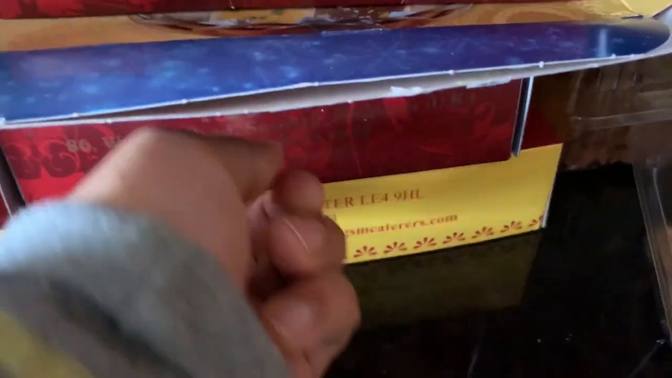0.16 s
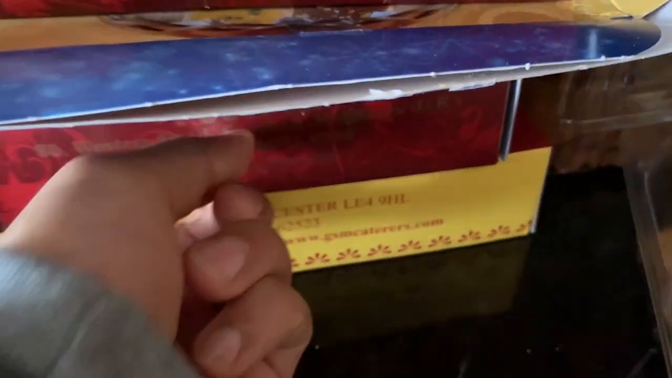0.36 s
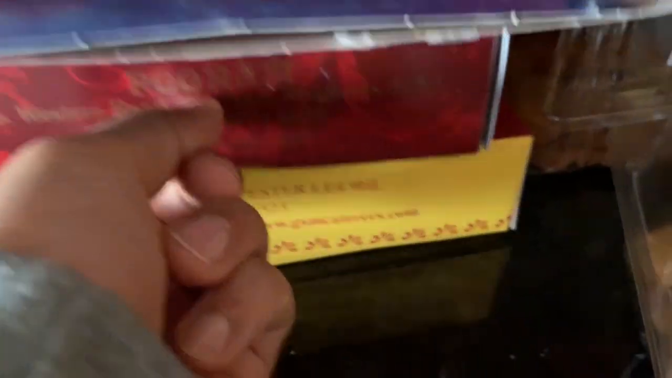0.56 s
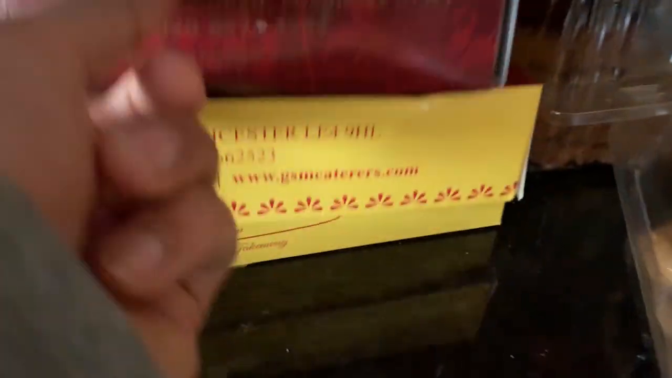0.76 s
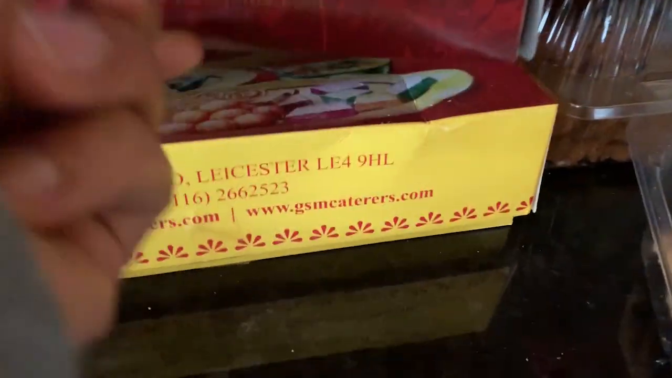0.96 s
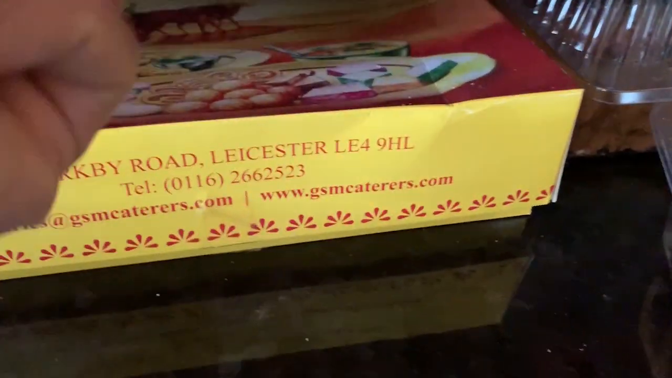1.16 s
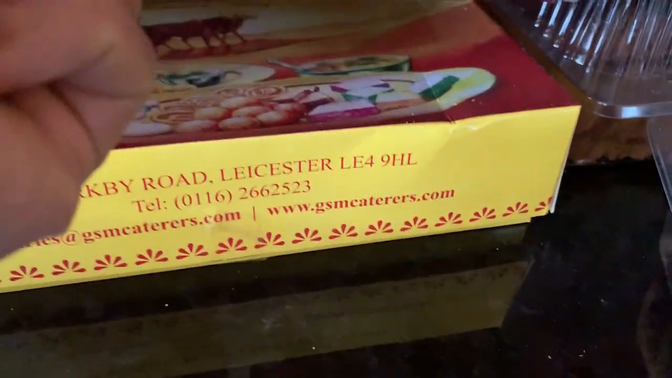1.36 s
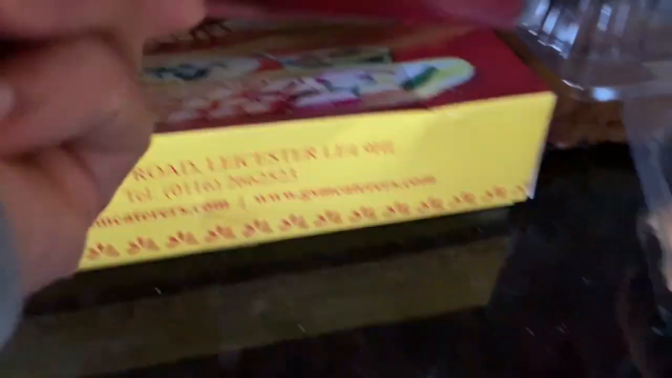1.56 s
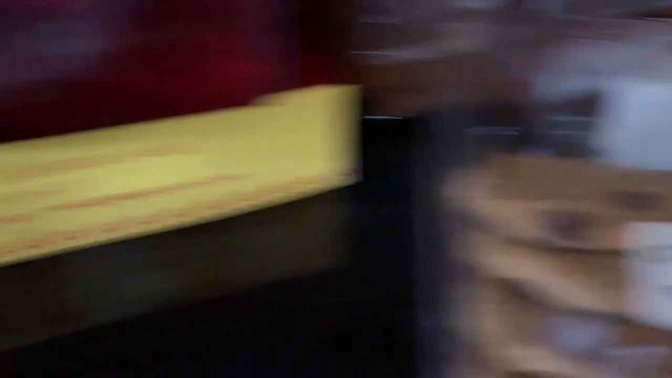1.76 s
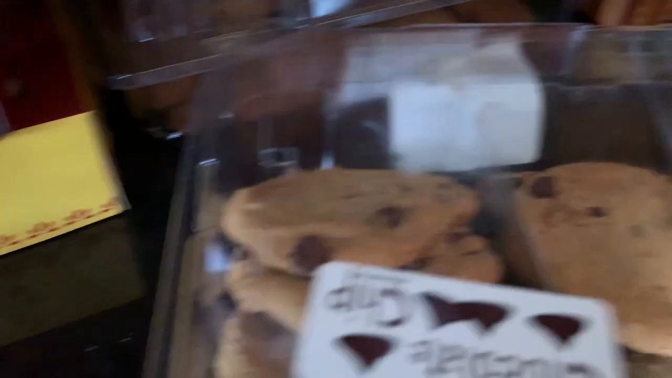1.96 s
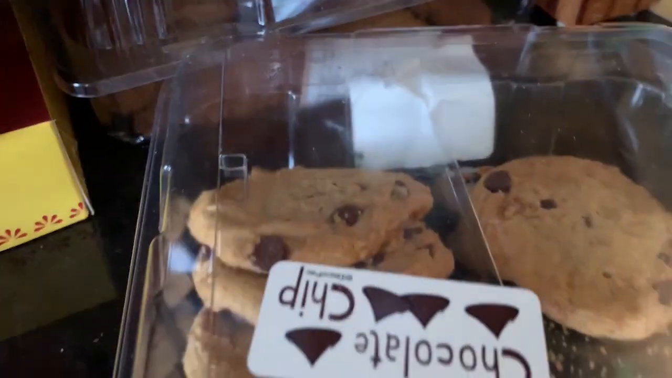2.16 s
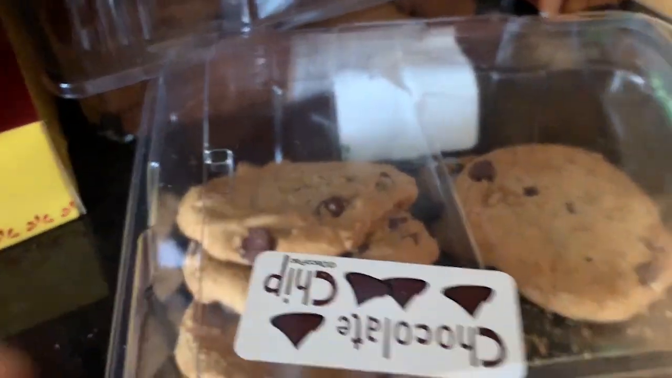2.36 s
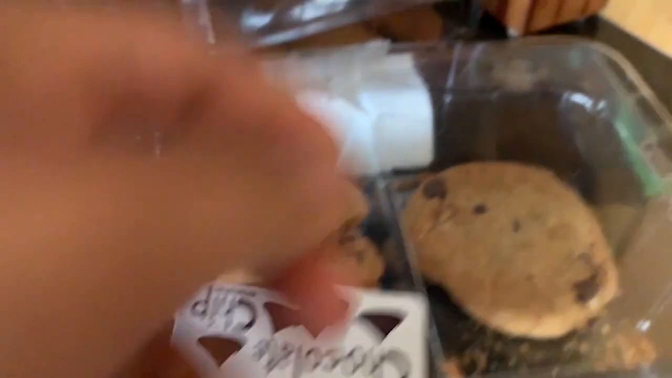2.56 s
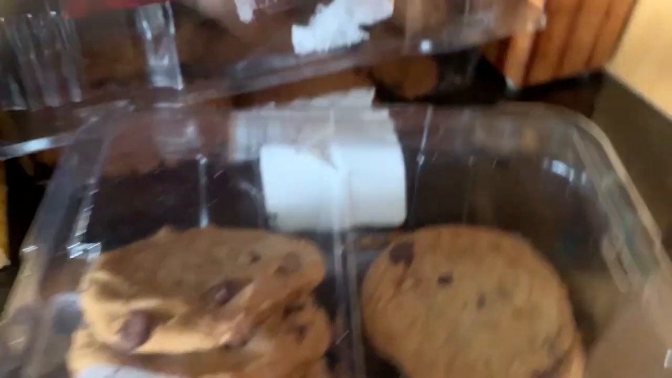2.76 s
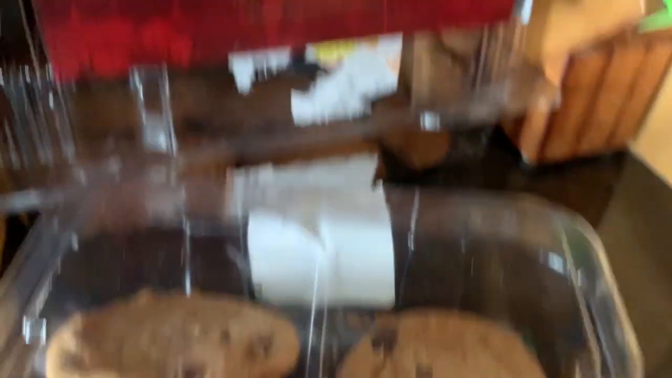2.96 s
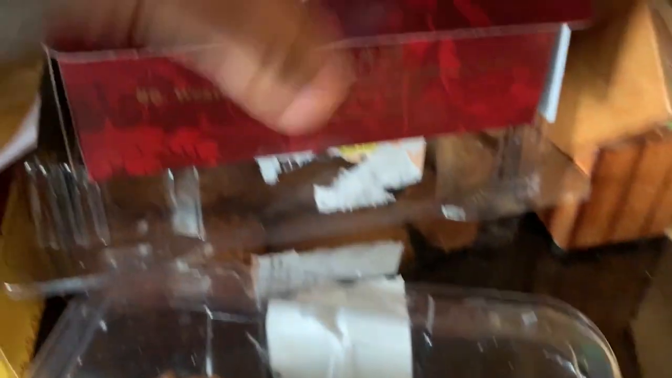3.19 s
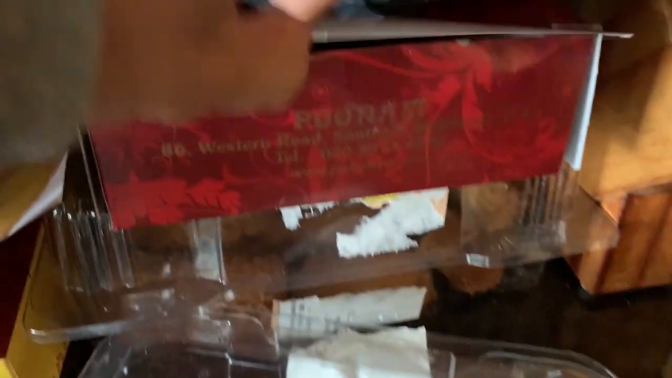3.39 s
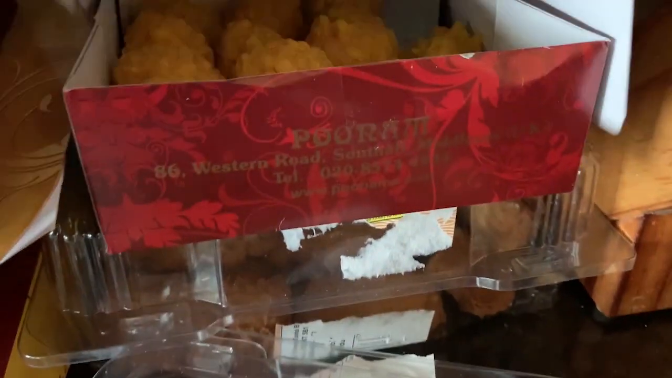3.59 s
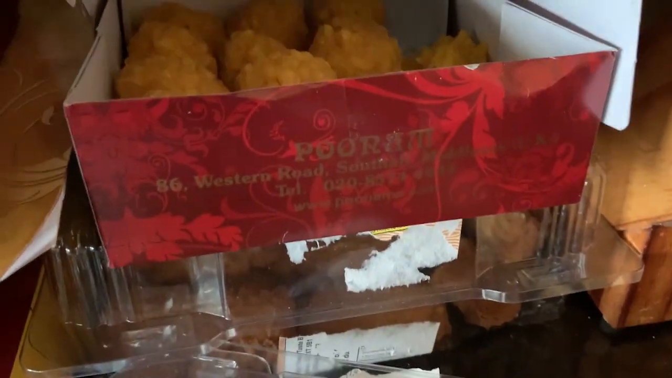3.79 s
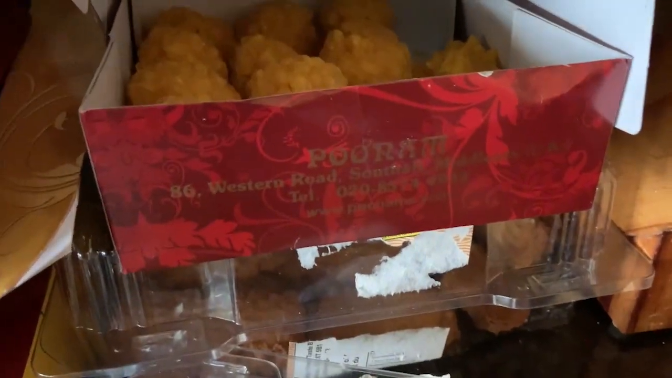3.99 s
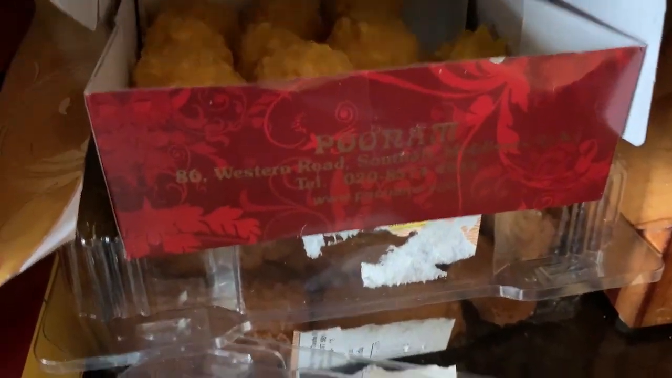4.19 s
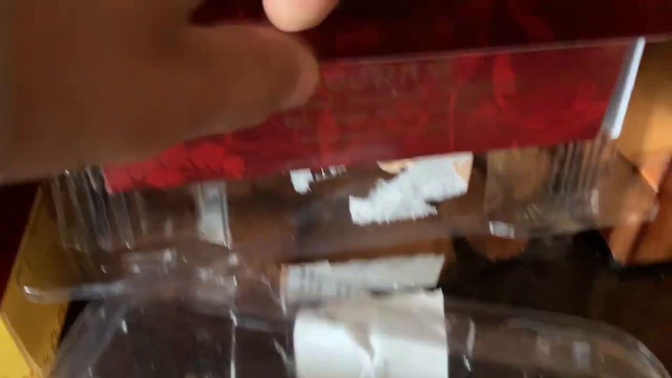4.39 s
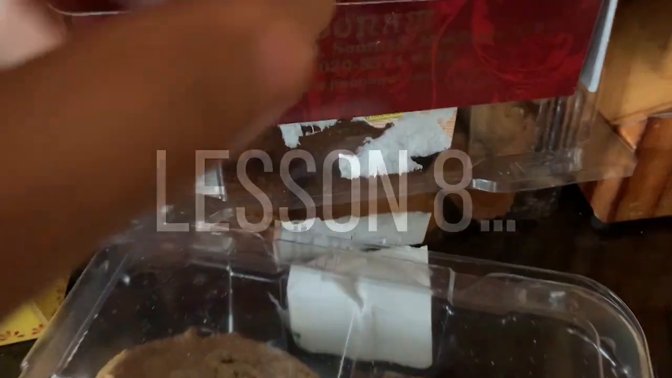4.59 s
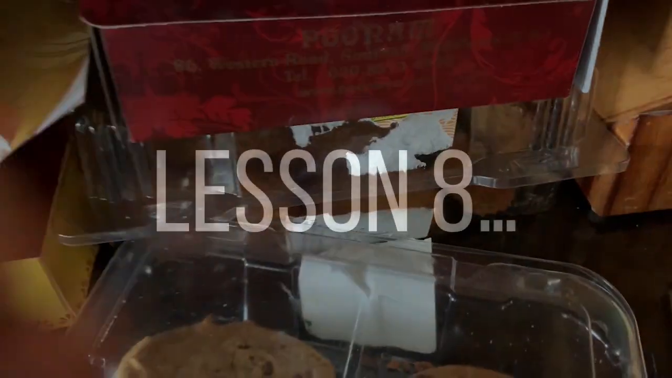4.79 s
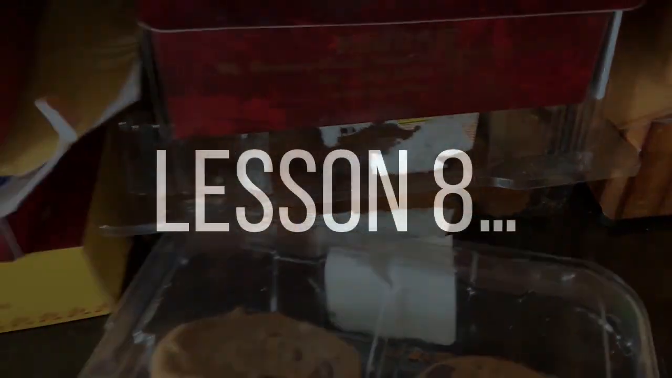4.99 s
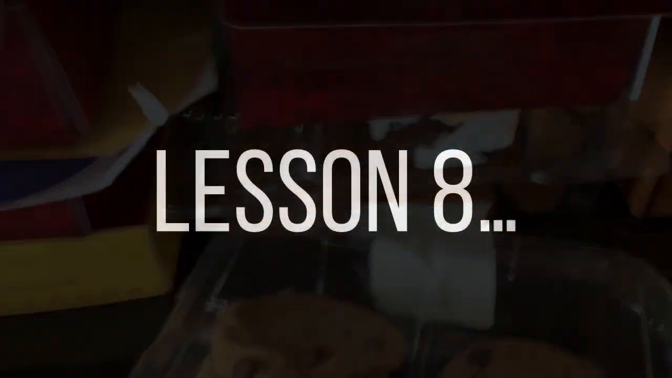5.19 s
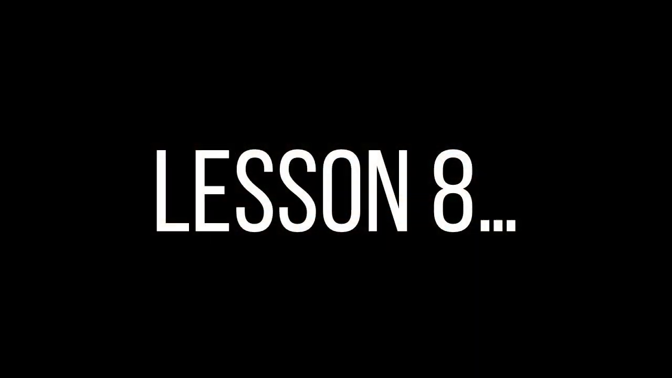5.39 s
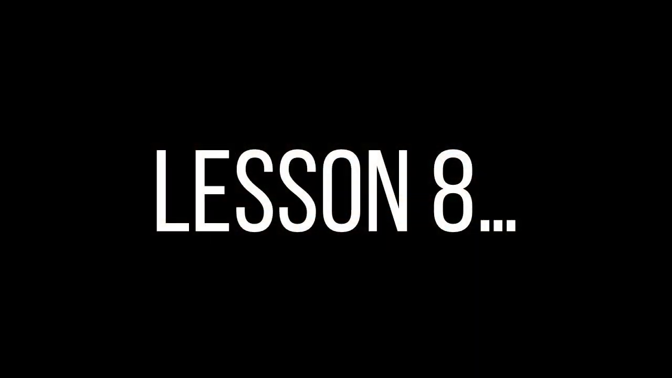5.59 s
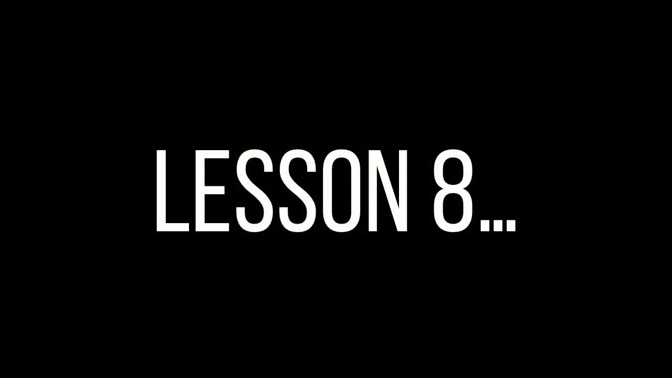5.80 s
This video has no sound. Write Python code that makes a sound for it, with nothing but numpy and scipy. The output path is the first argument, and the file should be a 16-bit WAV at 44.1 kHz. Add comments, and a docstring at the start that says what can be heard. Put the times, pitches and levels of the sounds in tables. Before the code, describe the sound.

Hands slide, open and shut cardboard food boxes and a crackly plastic tray close up, ending in a hard double knock over a low hum.

```python
"""Cardboard cake boxes on a stone worktop

Hands lift, slide and shut card boxes and a thin plastic tray close to a phone; at the end it fades to silence.
Sliding is grainy noise in clumps; knocks are short falling cycles in noise; thumps are slow swings of card
panels; snaps are bright bursts of a few ms. A short room answer follows the hits.
Behind lie the air noise of the room, a fridge hum that changes as the phone turns, and faint fan tones."""
import sys
import numpy as np
from scipy import signal
from scipy.fft import rfft, irfft, next_fast_len
from scipy.io import wavfile
from scipy.ndimage import uniform_filter1d, map_coordinates

SR = 44100
rng = np.random.default_rng(int(sys.argv[2]) if len(sys.argv) > 2 else 0)


def int16_out(signal):
    """Quantize to a 16-bit WAV file."""
    q = np.round(np.clip(np.atleast_2d(signal).T, -1, 1) * 32767)
    wavfile.write(sys.argv[1], SR, q.astype(np.int16))


N = 257984
T = np.arange(N) / SR
TOP_HZ = 17022  # highest frequency kept


def amp(db):
    """Gain of a level in dB."""
    return 10 ** (np.asarray(db) / 20)


def unit(x):
    """x at rms 1."""
    return x / np.sqrt(np.mean(x ** 2) + 1e-20)


def along(points, hz):
    """Curve through (Hz, value) points, straight on a log frequency axis."""
    f, v = np.transpose(points)
    return np.interp(np.log(hz + 1), np.log(f + 1), v)


def wobble(rate):
    """A smooth random curve with rate knots a second."""
    knots = rng.standard_normal(int(N * rate / SR) + 4)
    return map_coordinates(knots, [T * rate])


def filtered(x, response):
    """x shaped by a real or complex response of frequency."""
    m = next_fast_len(N + SR // 2)
    hz = np.fft.rfftfreq(m, 1 / SR)
    return irfft(rfft(x, m) * response(hz), m)[..., :N]


def spread(pair, spectrum, alike, lead):
    """Two unrelated signals, coloured, mixed to a left-right likeness and shifted between the ports."""
    def mix(hz):
        turn = np.arccos(np.clip(along(alike, hz), -1, 1)) / 2
        return amp(along(spectrum, hz)) * [np.cos(turn), np.sin(turn)]

    mid, side = filtered(pair, mix)
    stereo = np.array([mid + side, mid - side])
    return filtered(stereo, lambda hz: np.exp(.5j * np.outer([1, -1], along(lead, hz))))


def spread_near(pair, spectrum):
    """Places a sound made by hands near the phone between its two ports."""
    # likeness of the ports close up: (frequency [Hz], left-right likeness [0-1])
    near_alike = [(100, 0.69), (700, 0.61), (1500, 0.56), (6000, 0.32)]
    # phase by which the left port leads: (frequency [Hz], lead [rad])
    near_lead = [(100, -0.5), (1200, 0), (1700, -1.5), (3000, -2.5), (4600, 1.6), (5500, -3)]
    return spread(pair, spectrum, near_alike, near_lead)


def burst(centre_hz, width, swell_s, floor, count):
    """Noises of set energy around centre_hz (width as a share of it); swell_s scales their rise and fall."""
    t = np.arange(2048) / SR
    f = np.fft.rfftfreq(len(t), 1 / SR)
    band = 1j * f * width * centre_hz
    resonance = floor + band / (centre_hz ** 2 - f * f + band)
    swell = 2.05 * (1 - np.exp(-t / swell_s / .45)) * np.exp(-t / swell_s / 1.9)
    puffs = irfft(rfft(rng.standard_normal((count, len(t)))) * resonance) * swell
    return puffs * np.linalg.norm(swell) / np.linalg.norm(puffs, axis=1, keepdims=True)


def scattered(gain, count):
    """Chance moments, denser where a layer is louder, its level there in dB and two normal draws for each."""
    share = np.cumsum(np.sqrt(gain))
    at = np.searchsorted(share, share[-1] * rng.random(count))
    return T[at], 20 * np.log10(gain[at]), *rng.standard_normal((count, 2)).T


def tone(hz, waver_hz):
    """A tone of about rms 1 whose pitch and strength drift."""
    strength = np.sqrt(2) * amp(0.5 * wobble(12))
    return strength * np.sin(2 * np.pi * np.cumsum(hz + waver_hz * wobble(13)) / SR)


def room_air():
    """Steady noise of the room: coloured noise, broad between the ports, its level drifting slightly."""
    # colour of the room noise: (frequency [Hz], relative level [dB])
    air_colour = [(13, -43), (22, -14), (87, -21), (106, -11), (125, -7), (200, -5.5), (240, -7),
                  (262, -13), (310, -14), (365, -17), (442, -30), (560, -14), (680, -26), (850, -20.5),
                  (1300, -27.5), (2700, -29), (5000, -38), (8200, -48.5), (11400, -58), (15500, -68),
                  (16000, -110)]
    # likeness of the two ports: (frequency [Hz], left-right likeness [0-1])
    air_alike = [(60, 1), (180, 0.72), (550, 0.32), (1650, 0.4), (5000, 0.31)]
    # phase by which the left port leads: (frequency [Hz], lead [rad])
    air_lead = [(100, 0), (780, 1.94), (2580, 4.5), (7000, 21)]
    # balance of the ports: (frequency [Hz], left over right [dB])
    air_pan = [(60, 4.5), (130, 2), (290, 0.5), (640, 6.5), (1410, -0.5), (3100, -0.5), (6820, -4),
               (15000, 4)]
    level_db = -38.2
    air = unit(spread(rng.standard_normal((2, N)), air_colour, air_alike, air_lead))
    air = filtered(air, lambda hz: amp(np.outer([.5, -.5], along(air_pan, hz))))
    return air * amp(level_db + 1.3 * wobble(5) + 0.8 * wobble(25))


def fridge_hum():
    """Upper hum tones, whose level and balance follow the turning phone, over a steady lowest tone."""
    # hum tones that turn: (frequency [Hz], level against the turn's level [dB], waver [Hz])
    hum_tones = [(240.2, 0.8, 0.8), (361, -24, 1.5)]
    # the hum as the phone turns: (time [s], level [dB], left over right [dB])
    phone_turn = [(0.0, -50, 2), (0.95, -52, 4), (1.22, -43.5, 4), (1.6, -53, -2), (1.92, -45.5, -4),
                  (2.59, -44.5, -16), (2.83, -39, -8), (3.02, -37, -4.5), (3.33, -38, -6), (3.7, -36, -5),
                  (4.26, -37, -5), (4.8, -39.5, -7)]
    s, hum_db, pan_db = np.transpose(phone_turn)
    hum = sum(amp(db) * tone(hz, waver_hz) for hz, db, waver_hz in hum_tones)
    pan = np.outer([.5, -.5], np.interp(T, s, pan_db))
    lowest = amp(-51) * tone(120.1, waver_hz=0.4)  # alike in both ports
    return hum * amp(np.interp(T, s, hum_db) + pan) + lowest


def fan_tones():
    """A low drone and faint higher fan tones, each drifting, alike in both ports."""
    # faint fan tones: (frequency [Hz], level [dB], waver [Hz])
    fan_whine = [(556, -65, 10), (1730, -64, 3.8)]
    drone = amp(-53) * tone(32.5, waver_hz=2)
    return drone + sum(amp(db) * tone(hz, waver_hz) for hz, db, waver_hz in fan_whine)


def room():
    """Everything that sounds behind the hands."""
    return room_air() + fridge_hum() + fan_tones()


def walls(x):
    """The room's answer: a noise tail in which each frequency dies at its own speed."""
    # how fast the room dies: (frequency [Hz], time to die 60 dB [s])
    wall_decay = [(150, 0.35), (1500, 0.16), (5000, .1), (10000, 0.054)]
    hz, t, z = signal.stft(rng.standard_normal((2, SR // 2)), SR, nperseg=256)
    dying = amp(-60 * t / along(wall_decay, hz)[:, None])
    tail = signal.istft(z * dying, SR, nperseg=256)[1]
    return signal.fftconvolve(x, tail / np.linalg.norm(tail[0]), axes=1)[:, :N]


def slides():
    """Gains of crackle, scrape and rumble over time: every slide swells to its level and dies away."""
    # slides of the hands: (strongest at [s], plastic's 20 dB rise [s], plastic's 20 dB fall [s],
    # plastic crackle [dB], card scrape [dB], box rumble [dB])
    hand_moves = [(0.01, .05, .075, -48.5, -42, -43), (0.155, .12, 0.16, -55, -46.5, -46),
                  (0.3, .2, 0.38, -56, -43.5, -40), (0.4, .1, .2, -63, -50, -40),
                  (0.54, .08, .3, -56, -46, -46), (0.616, .15, .1, -54, -47, -45),
                  (0.783, .16, .15, -47.5, -43, -41), (0.876, .07, .2, -48, -40, -37),
                  (1.105, 0.16, .2, -52.5, -41.5, -39), (1.225, .05, 0.14, -48.5, -40.5, -45),
                  (1.285, .1, .05, -44, -39, -38.5), (1.619, .1, .25, -48.5, -42, -41),
                  (1.785, .07, .13, -38, -31, -33), (1.93, .1, .2, -60, -62, -49),
                  (1.45, .1, .2, -76, -57, -46), (2.771, .008, .6, -41, -54, -49),
                  (2.846, .05, .05, -33, -37, -40), (2.895, .05, .3, -31.5, -35.5, -37),
                  (3.163, .2, .7, -41.5, -45, -46), (3.4, .015, .06, -35, -44, -41),
                  (3.421, .04, .012, -36, -44, -41), (3.542, .16, 0.31, -39, -42, -38),
                  (3.667, .3, .15, -43, -40, -45), (3.816, .15, .08, -55, -52, -47),
                  (3.99, 0.08, .1, -68, -50, -47), (4.151, .12, .5, -60.5, -55, -50),
                  (4.35, .11, .3, -40, -44, -35), (4.418, .1, .07, -31, -33, -29),
                  (4.465, .06, .1, -33, -30, -27), (4.56, .2, .2, -49, -47, -45),
                  (4.617, .1, .05, -52, -38, -36), (4.75, .2, .3, -71, -56, -49)]
    lingers = [[1], [1.1], [1.35]]  # card and box swell and die this many times more slowly than plastic
    step = 64  # samples between gain points
    t = np.arange(N // step + 2) * step / SR
    power = np.full((3, len(t)), 1e-12)
    for s, rise_s, fall_s, *db in hand_moves:
        away = np.maximum((t - s) / fall_s, (s - t) / rise_s) / lingers
        power += amp(np.c_[db] - 20 * away) ** 2
    return [np.interp(T, t, gain) for gain in np.sqrt(power)]


def grit(spectrum, rate, spike_db, clump_db, patchy_db):
    """Stick-slip grains (rate a second) in clumps over a little hiss; each moment favours other pitches."""
    grains = (rng.random(N) < rate / SR) * amp(spike_db * rng.standard_normal(N))
    clumps = amp(clump_db * (0.55 * wobble(60) + wobble(220)))
    rough = (grains + 0.44) * clumps * rng.standard_normal((2, N))
    z = signal.stft(rough, nperseg=256)[2]
    # random patches, smooth over 5 frequency bins and 3 time frames
    patches = uniform_filter1d(rng.standard_normal(z.shape[1:]), size=5, axis=0)
    patches = uniform_filter1d(patches, size=3, axis=1)
    patchy = signal.istft(z * amp(patchy_db * unit(patches)), nperseg=256)[1][:, :N]
    return unit(spread_near(patchy, spectrum))


def rubbing(crackle, scrape, rumble):
    """Fingers and flaps slide: plastic crackles, card scrapes, the box rumbles."""
    # colours of thin plastic, card and box: each (frequency [Hz], relative level [dB])
    plastic_colour = [(3000, -31.5), (4500, -6.5), (6300, -4), (7300, -3), (9300, 0.5), (12000, -4),
                      (15700, -3.5), (16000, -52)]
    card_colour = [(350, -28), (600, 1.5), (1230, -2), (1730, -4), (2950, -8.5), (3340, -9.5), (4190, -10),
                   (6060, -21), (7000, -16.5), (9100, -49), (15400, -120)]
    box_colour = [(29, -41.5), (50, -10), (130, -3), (320, 6.5), (454, -2), (528, -6), (788, -18),
                  (1000, -14), (1300, -39), (2200, -120)]
    plastic = grit(plastic_colour, 4400, spike_db=3.2, clump_db=2.0, patchy_db=1)
    card = grit(card_colour, 6000, spike_db=2.5, clump_db=1.2, patchy_db=3.0)
    box = grit(box_colour, 1500, spike_db=4.2, clump_db=2.0, patchy_db=1.5)
    return crackle * plastic + scrape * card + rumble * box


def knocks(scrape):
    """Each knock is a sharp edge, then a few falling cycles in a dry puff of noise; low ones last longer."""
    # knocks of box edges and tray rims: (time [s], level [dB], centre [Hz], sharp edge against level [dB])
    rim_hits = [(0.241, -28, 1050, 4), (0.285, -31.5, 950, -8), (0.315, -27, 900, 1),
                (0.3915, -24.5, 900, -9), (0.418, -35, 900, -16), (0.517, -38, 620, -10),
                (0.573, -38, 1550, -20), (0.608, -35, 800, -14), (0.818, -33, 500, -3),
                (0.874, -25, 1380, -24), (0.892, -23, 660, -22), (1.038, -35, 560, -8),
                (1.095, -35, 1250, -20), (1.219, -25, 1150, -8), (1.222, -29, 1000, -8),
                (1.228, -32, 1100, -8), (1.242, -38, 644, -10), (1.293, -32, 1220, -14),
                (1.632, -34, 740, 2), (1.783, -31, 660, 0), (2.83, -32, 700, -8), (2.847, -25.5, 880, -8),
                (2.858, -32, 900, -10), (2.884, -30, 1170, -12), (2.899, -23, 1250, -3),
                (2.911, -33, 620, -6), (2.928, -21.5, 870, -10), (2.953, -35, 640, -8),
                (3.153, -29, 1150, -2), (3.175, -37, 800, -12), (3.189, -33, 850, -6),
                (3.262, -32, 900, -3), (3.294, -37, 1300, -4), (3.309, -33, 780, -14),
                (3.317, -34, 800, -16), (3.379, -37, 700, -14), (3.495, -36, 700, -14),
                (3.508, -36, 1500, -10), (3.518, -30, 640, -1), (3.553, -29, 1500, -8),
                (3.557, -25, 760, -7), (3.563, -26, 560, -14), (3.575, -35, 750, -8),
                (3.61, -24.5, 1300, -5), (3.647, -25, 1800, -8), (3.664, -31.5, 1650, -6),
                (3.681, -35, 2500, -14), (3.732, -40, 850, -2), (4.305, -35, 620, -4),
                (4.358, -34, 1400, -6), (4.365, -28.5, 800, -4), (4.374, -27, 720, -6),
                (4.391, -30, 720, -5), (4.4105, -16.5, 703, -2), (4.421, -28, 850, -6), (4.43, -22, 900, 0),
                (4.432, -23, 2300, -10), (4.434, -22, 950, -10), (4.4385, -14, 800, -12),
                (4.447, -25, 1050, -14), (4.4612, -7, 780, -9), (4.474, -16, 1850, -4),
                (4.475, -17, 1150, -10), (4.478, -18.5, 950, 1), (4.486, -27, 900, 2),
                (4.569, -31, 1250, 0), (4.612, -20, 680, -3), (4.617, -24, 1280, 2), (4.622, -31, 1100, -5),
                (4.757, -39, 750, -8)]
    # modes of a knock: (multiple of its centre, level [dB])
    knock_modes = [(1, 0), (1.5, -11), (1.9, -13), (2.4, -14)]
    puff_db = -7  # noise against the cycles
    sweep, sweep_s = .15, .0008  # starts this share above centre and falls: high bending waves arrive first
    # chance knocks: level over the scrape, its scatter, centre and its log scatter
    over_db, scatter_db, centre_hz, spread_hz = 0, 3, 900, .3
    small = [(s, db + over_db + scatter_db * a, centre_hz * np.exp(spread_hz * b), -6)
             for s, db, a, b in zip(*scattered(scrape, count=8))]
    out, t = np.zeros((2, N + SR)), np.arange(2048) / SR
    for s, db, hz, edge_db in rim_hits + small:
        swell_s = 0.0006 + 0.9 / hz
        puff = burst(hz, width=0.5, swell_s=swell_s, floor=.03, count=2)
        edge = burst(2000, width=1.2, swell_s=.0008, floor=.05, count=2) * [[1], [.6]]
        turns = hz * (t + sweep * sweep_s * (1 - np.exp(-t / sweep_s)))
        cycles = sum(amp(mode_db) * np.sin(2 * np.pi * k * turns) for k, mode_db in knock_modes)
        cycles = cycles * np.sqrt(t / swell_s) * np.exp(.6 - t / swell_s / 1.35)
        # the cycles go into one of the two signals that are then mixed to both ports
        knock = amp(puff_db) * puff + amp(edge_db) * edge + cycles * [[1], [0]]
        start = round(s * SR)
        out[:, start:start + len(t)] += amp(db) * knock
    return spread_near(out[:, :N], [(250, -7), (550, -1), (2500, -0.5), (6000, -18)])  # (Hz, dB)


def thumps():
    """A card panel swings for a cycle or two at its own pitch and rings on faintly."""
    # thumps of card panels and deep pushes into the worktop: (time [s], level midway between the ports [dB],
    # pitch [Hz], first swing [1 out, -1 in])
    panel_hits = [(0.001, -17.5, 172, -1), (0.279, -31, 150, -1), (0.317, -25, 330, -1),
                  (0.395, -26, 380, -1), (0.406, -27, 260, 1), (0.461, -28, 260, 1), (0.52, -29, 280, 1),
                  (0.575, -29, 290, 1), (0.6155, -23.5, 160, 1), (0.644, -28, 150, 1),
                  (0.762, -28, 340, -1), (0.818, -27, 220, -1), (0.8748, -12.5, 300, -1),
                  (0.8875, -17.5, 250, -1), (0.8915, -20.5, 310, -1), (0.892, -26, 105, 1),
                  (0.897, -20, 230, -1), (0.9, -38, 55, 1), (1.1186, -16.5, 210, -1), (1.223, -25, 330, -1),
                  (1.232, -25, 200, 1), (1.2425, -23, 290, 1), (1.3075, -25, 105, 1), (1.506, -29, 280, -1),
                  (1.755, -26, 330, -1), (1.764, -25, 350, -1), (1.777, -25, 357, -1), (1.79, -33, 60, 1),
                  (1.795, -27, 110, -1), (1.841, -30, 150, -1), (2.849, -18, 293, -1),
                  (2.858, -24, 300, -1), (2.899, -22, 420, -1), (3.5203, -19.5, 320, -1),
                  (3.557, -27, 300, -1), (3.574, -27, 280, -1), (4.4115, -10, 270, -1),
                  (4.421, -17, 230, -1), (4.431, -22, 280, -1), (4.4395, -13, 240, -1),
                  (4.452, -17, 260, -1), (4.4617, -3.5, 272, 1), (4.479, -20, 280, -1),
                  (4.5, -25.5, 239.4, -1), (4.529, -27.5, 326, -1), (4.53, -35.5, 50, 1),
                  (4.612, -25, 380, -1)]
    peak_cycles = 0.72  # cycles until the swing is widest
    ring_db, ring_cycles = -17, 7  # after-ring: its level, and cycles to die 20 dB
    panel, t = np.zeros(N + SR), np.arange(SR // 5) / SR
    for s, db, hz, way in panel_hits:
        flex = np.sin(2 * np.pi * hz * t) + 0.2 * np.sin(2 * np.pi * 1.608 * hz * t)
        age = hz * t / peak_cycles
        swing = (age * np.exp(1 - age)) ** 1.7
        ring = amp(ring_db - 20 * hz * t / ring_cycles) * (1 - np.exp(-age))
        panel[round(s * SR):][:len(t)] += np.sign(way) * amp(db) * (swing + ring) * flex
    return panel[:N] * amp([[.6], [-.6]])  # dB: slightly louder on the left


def snaps(crackle):
    """Each snap is a burst of a few ms, bright on top around a varying centre, with a duller body."""
    # snaps of plastic and glued flaps: (time [s], level [dB], body against level [dB], centre [Hz])
    flap_snaps = [(0.2405, -30.5, 8, 12000), (0.3142, -25, 3.5, 15550), (0.39, -36.5, -8, 7370),
                  (0.5106, -44, -7, 8580), (0.602, -46.5, 11, 8100), (0.8153, -27.5, -4.5, 12000),
                  (0.8639, -22.5, -31, 11800), (0.8714, -30.5, -17, 11800), (1.045, -36, -10, 10600),
                  (1.0929, -38, -6, 11200), (1.2166, -23.5, -2, 10900), (1.246, -31, -5, 8470),
                  (1.2892, -17.5, -22, 11300), (1.3067, -29, -15.5, 11400), (1.6317, -36, -8, 8130),
                  (1.784, -26, 0.5, 11600), (1.7955, -27, 1, 15070), (2.7717, -28.5, -8, 7100),
                  (2.8102, -31, -12, 15200), (2.85, -25, -12, 11500), (2.8935, -22, -12, 8300),
                  (2.922, -26, -10, 8000), (2.949, -27, -12, 12000), (3.127, -35, 0, 8220),
                  (3.2532, -32, -14, 12100), (3.2592, -32, -10, 12400), (3.2886, -30, -14, 11700),
                  (3.318, -33, -12, 11500), (3.347, -23, -20, 14800), (3.4672, -33, -12, 11800),
                  (3.575, -33, -10, 8000), (3.7316, -37, -8, 12000), (3.8045, -40, -10, 15000),
                  (2.839, -26, -9.5, 8570), (2.845, -19.5, -10, 11660), (2.8768, -18.5, -11, 7600),
                  (2.8894, -20, -4, 8390), (2.9004, -16.5, -4.5, 15400), (2.974, -30.5, -9, 11000),
                  (2.987, -28.5, -12.5, 10970), (3.011, -29, -6, 11300), (3.0394, -31, 0, 11100),
                  (3.1525, -25, 3, 8070), (3.2467, -32, -12, 7570), (3.341, -27, -8, 11000),
                  (3.353, -21, -18, 14670), (3.3998, -25.5, -6, 8700), (3.4045, -24, -6, 7590),
                  (3.419, -27, -10.5, 8310), (3.5044, -32.5, 3, 7650), (3.543, -29, -4.5, 15000),
                  (3.517, -36, 3, 8000), (3.554, -38, 4, 8000), (3.61, -33, 3, 8310), (3.664, -38, 4, 8000),
                  (3.6461, -33, -1, 11300), (3.6794, -33, 3.5, 8100), (3.708, -22.5, -22, 11600),
                  (3.819, -26, -8, 8800), (3.9074, -35.5, -17, 7390), (4.145, -42.5, -11, 8010),
                  (4.3853, -26, 1.5, 11190), (4.4079, -25.5, -5.5, 8490), (4.424, -24.5, -3.5, 8100),
                  (4.4594, -9, -2, 7340), (4.4718, -9.5, 4.5, 7400), (4.569, -32, 1.5, 12150),
                  (4.618, -28.5, 5.5, 7750), (5.121, -31, -12, 12000), (5.1518, -39, -1, 7760)]
    # colours of the bright top and the duller body: each (frequency [Hz], level [dB])
    top_colour = [(2900, -30), (5000, -16.5), (7070, -3), (9640, -2), (11500, -2), (13300, -3), (15800, -4),
                  (16900, -37)]
    body_colour = [(1000, -27), (2000, -3), (3300, -2.5), (5000, -4), (6500, -8), (9000, -26)]
    base_s, grows = 0.0006, 0.2  # swell of a -30 dB snap; dB of length gained per dB of level
    # chance snaps: level over the crackle, its scatter, body, centre and its log scatter
    over_db, scatter_db, small_body_db, centre_hz, spread_hz = 7, 2.5, -16, 10500, 0.4
    small = [(s, db + over_db + scatter_db * a, small_body_db, min(centre_hz * np.exp(spread_hz * b), TOP_HZ))
             for s, db, a, b in zip(*scattered(crackle, count=70))]
    top, body = np.zeros((2, 2, N + SR))
    for s, db, body_db, hz in flap_snaps + small:
        at = slice(round(s * SR), round(s * SR) + 2048)
        swell_s = base_s * amp(grows * (db + 30))
        top[:, at] += amp(db) * burst(hz, width=0.16, swell_s=swell_s, floor=.5, count=2)
        body[:, at] += amp(db + body_db) * burst(3500, width=3.0, swell_s=0.0018, floor=1.0, count=2)
    return spread_near(top[:, :N], top_colour) + spread_near(body[:, :N], body_colour)


def scene():
    """Handling with a little room around its hits, over the room tone."""
    crackle, scrape, rumble = slides()
    hits = snaps(crackle) + thumps() + knocks(scrape)
    return room() + amp(-15.0) * walls(hits) + rubbing(crackle, scrape, rumble) + hits


def record(dry):
    """Treble mostly from one port, left side late; loud peaks round off; band limit; a closing fade-out."""
    one_port_hz = 6960  # above this both channels carry mostly one port
    left_lag_s = 1 / 3870
    fade_start_s, fade_end_s = 4.86, 5.468

    def share(hz):
        return 1 / (1 + (one_port_hz / (hz + 1)) ** 30)

    def late(hz):
        return np.exp(-1j * np.pi * np.outer([1, -1], hz) * left_lag_s)

    both_ports = filtered(dry, lambda hz: (1 - share(hz)) * (hz > 18))
    one_port = dry[[0, 0]] + 0.067 * dry[1] * [[1], [-1]]
    wired = both_ports + filtered(one_port, lambda hz: share(hz) * late(hz))
    rounded = wired / (1 + np.abs(wired / .94) ** 8) ** (1 / 8)
    fade = np.clip((fade_end_s - T) / (fade_end_s - fade_start_s), 0, 1)
    return filtered(rounded, lambda hz: hz < TOP_HZ) * fade


dry = scene()
out = record(dry)
int16_out(out)
```